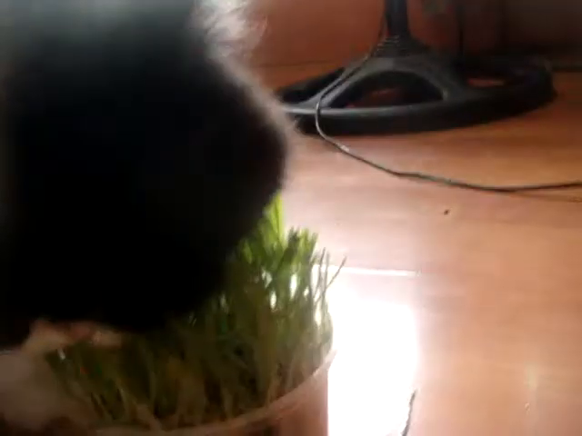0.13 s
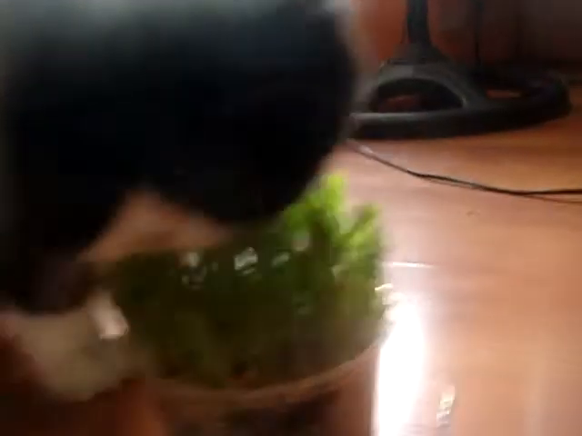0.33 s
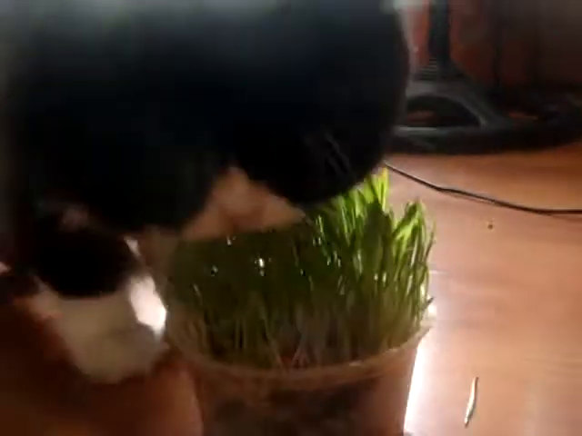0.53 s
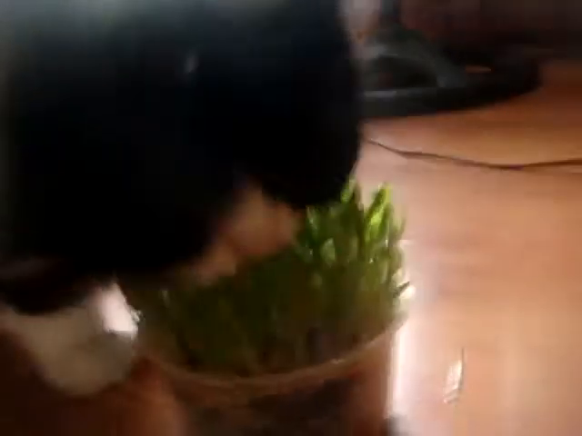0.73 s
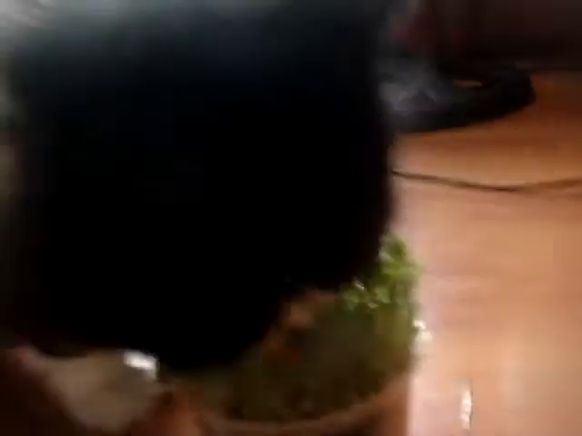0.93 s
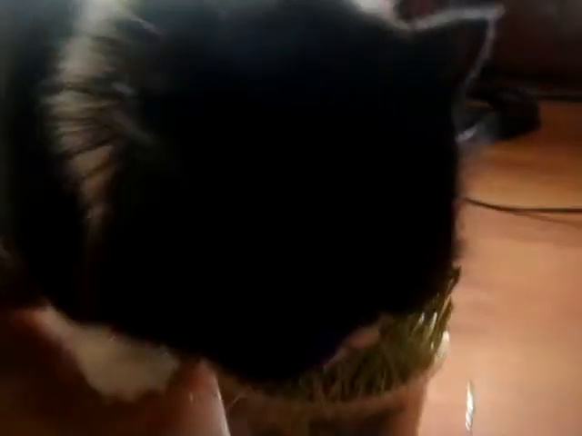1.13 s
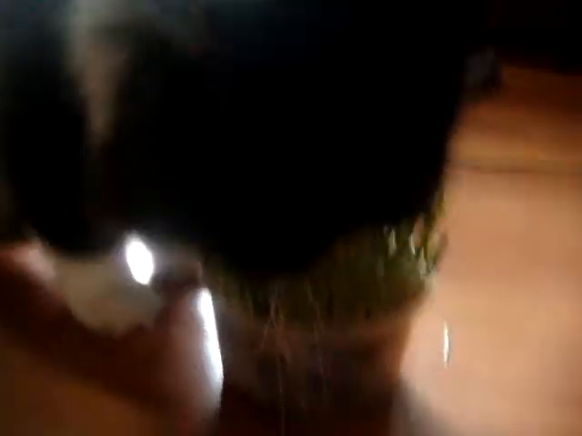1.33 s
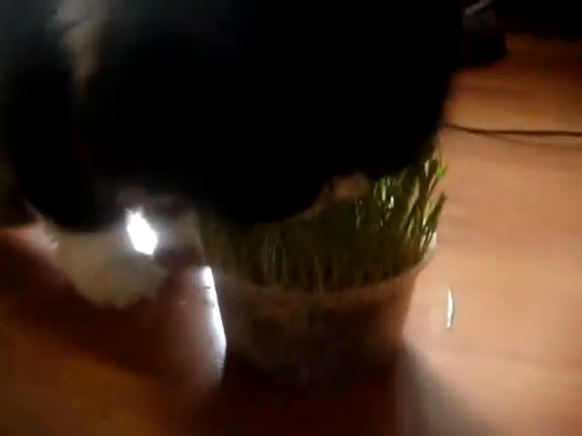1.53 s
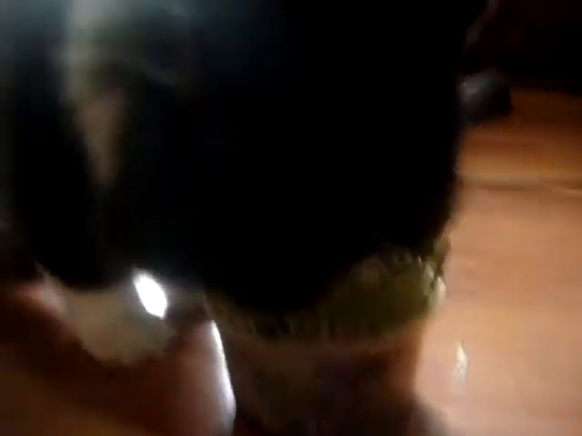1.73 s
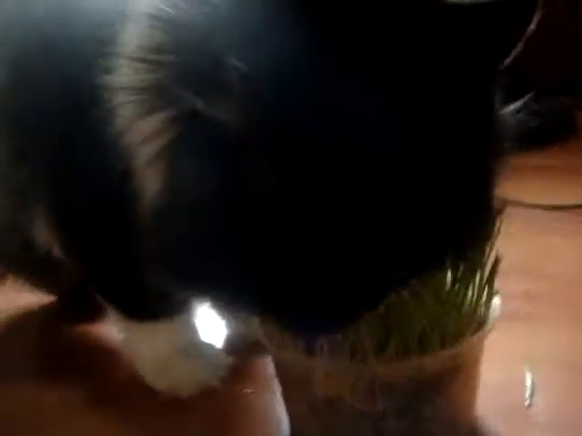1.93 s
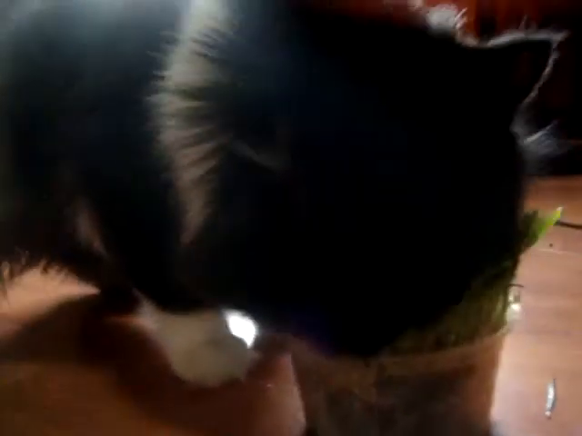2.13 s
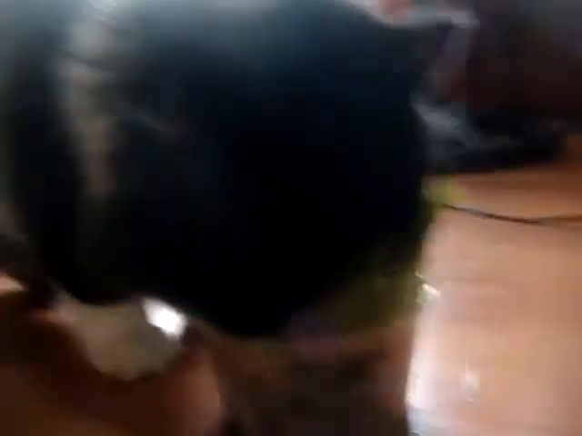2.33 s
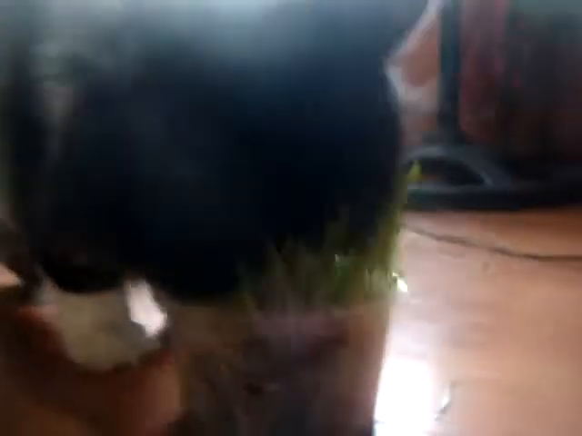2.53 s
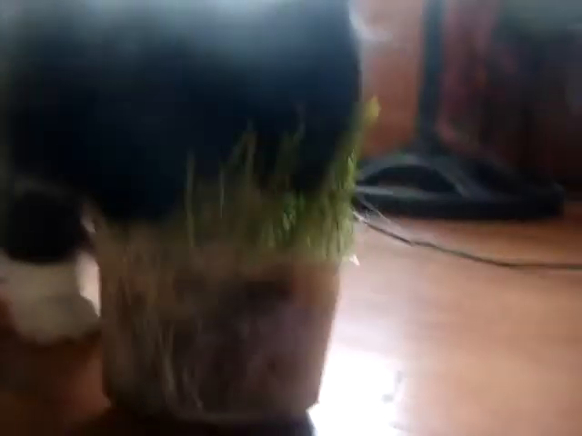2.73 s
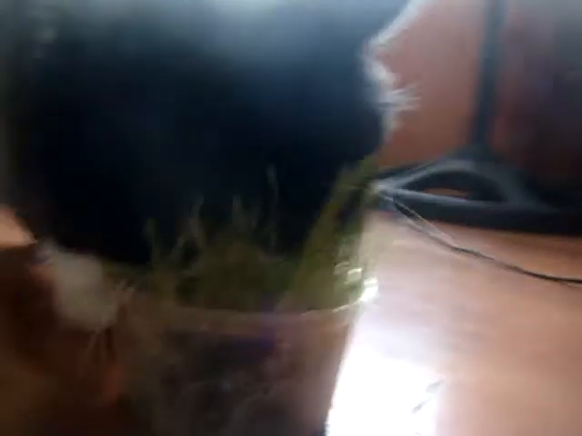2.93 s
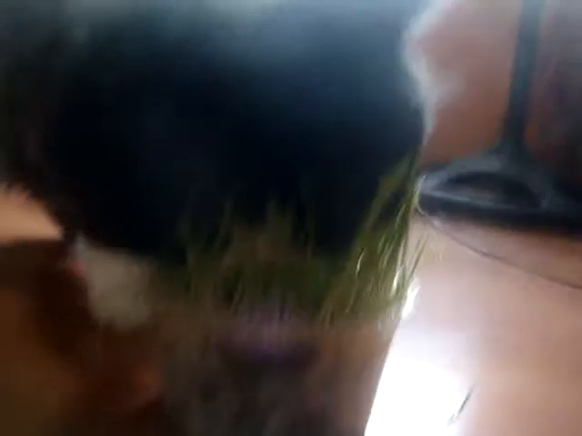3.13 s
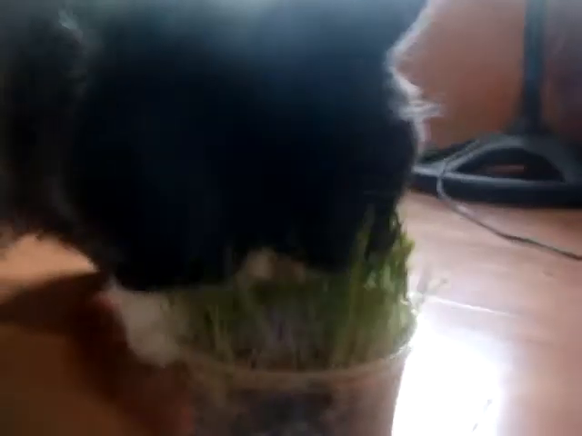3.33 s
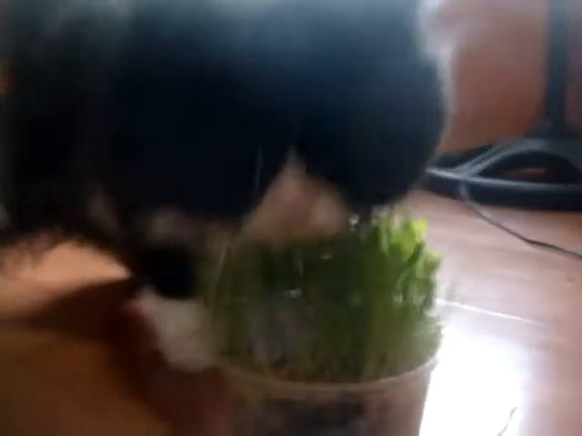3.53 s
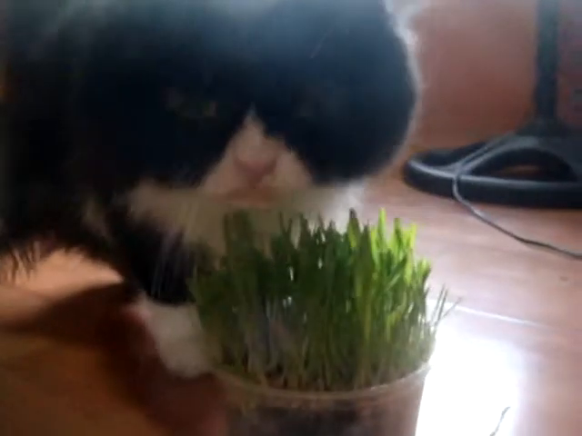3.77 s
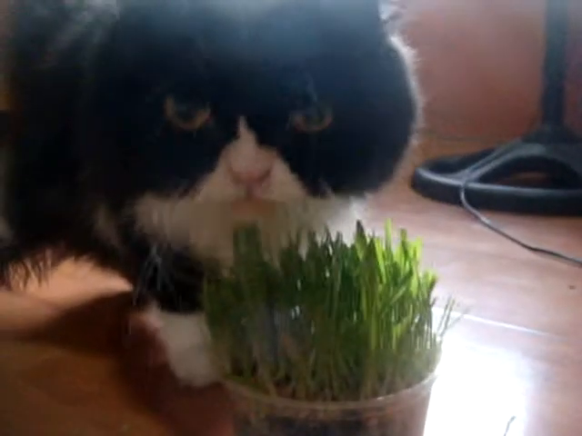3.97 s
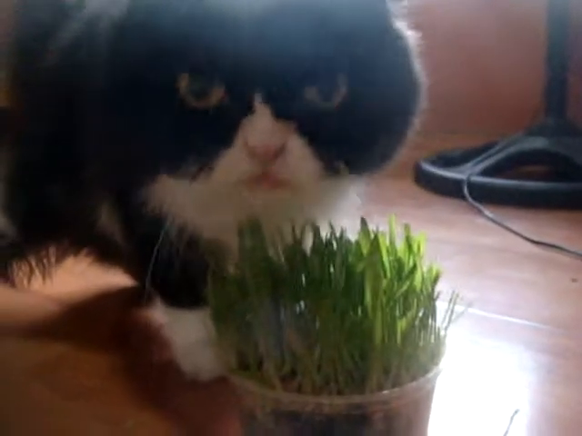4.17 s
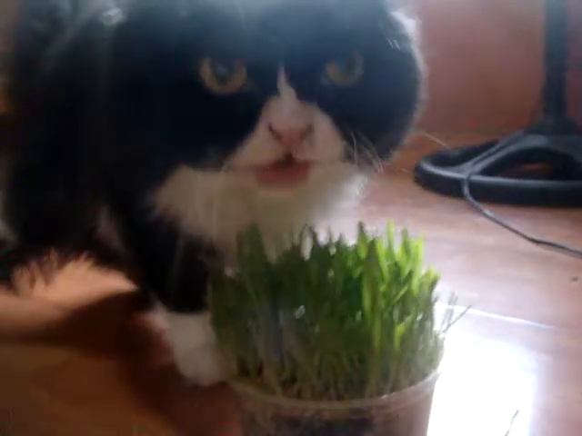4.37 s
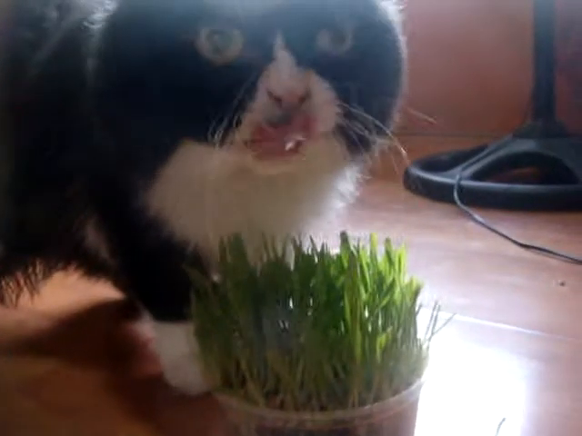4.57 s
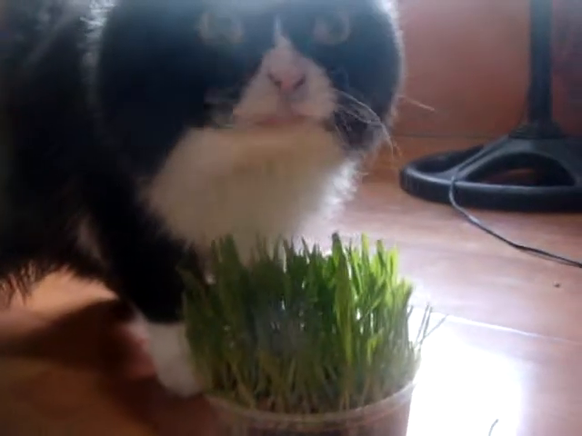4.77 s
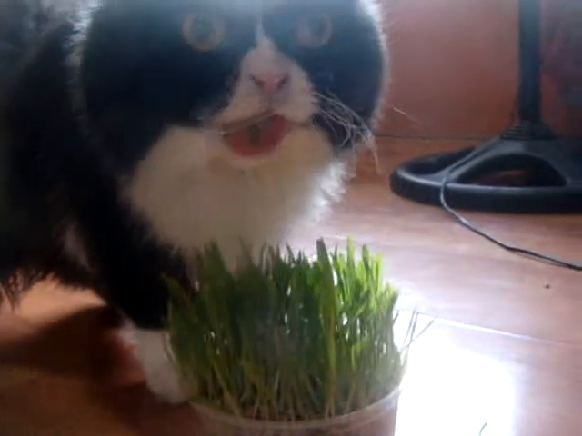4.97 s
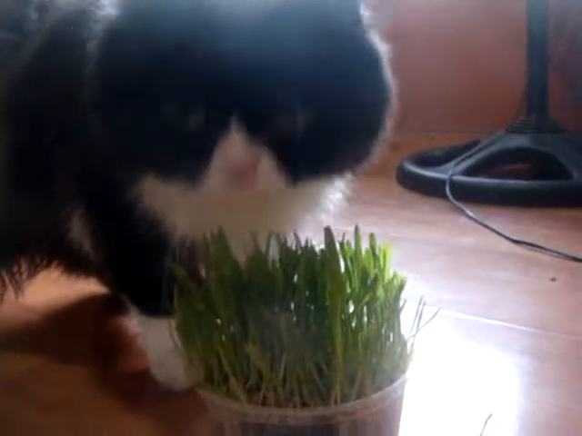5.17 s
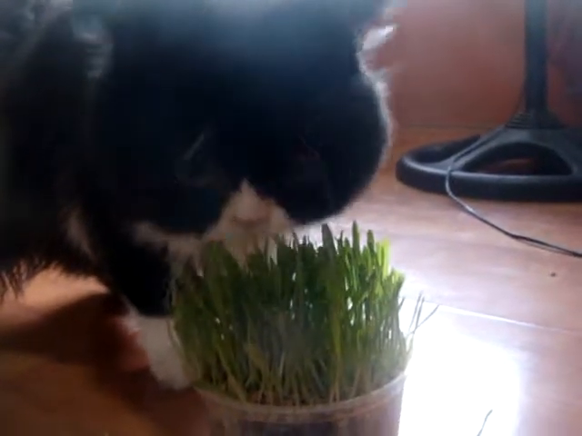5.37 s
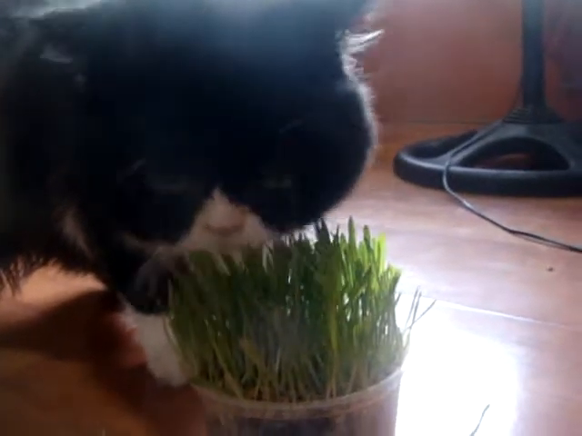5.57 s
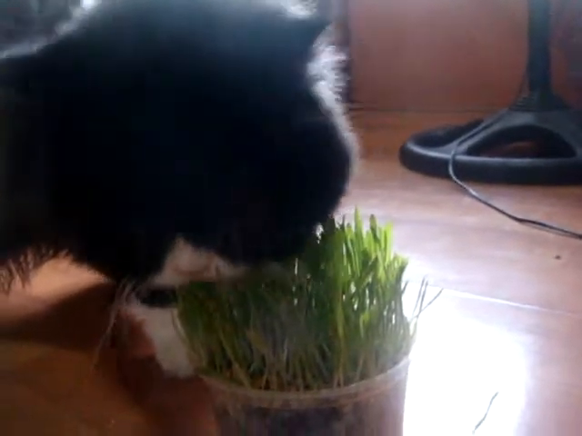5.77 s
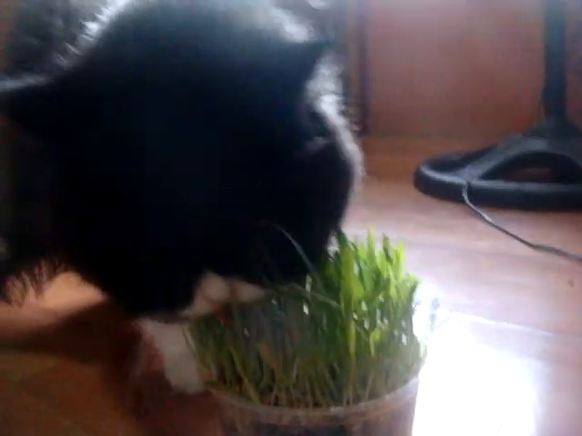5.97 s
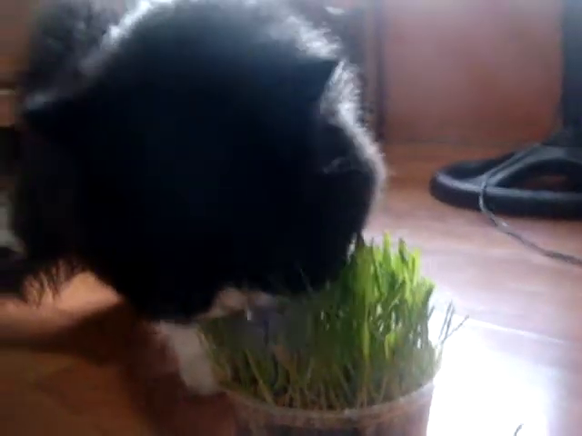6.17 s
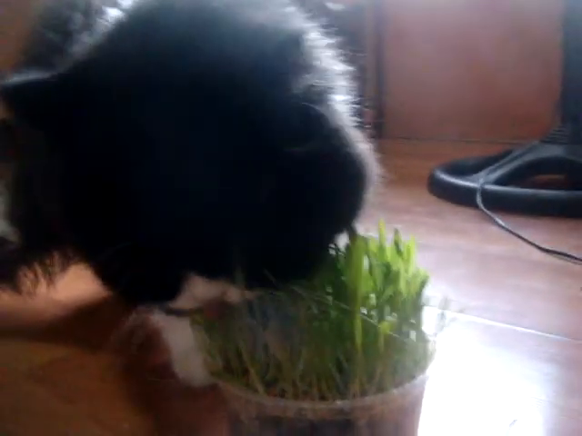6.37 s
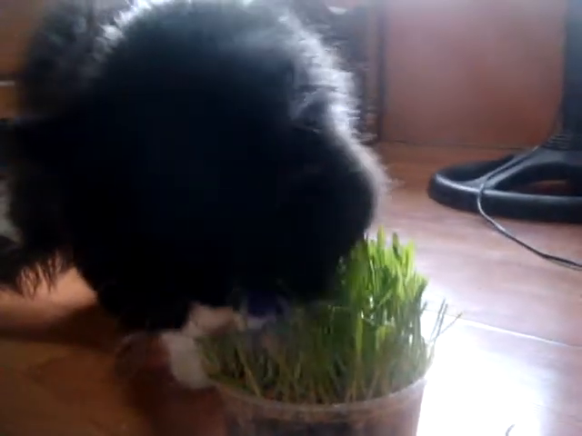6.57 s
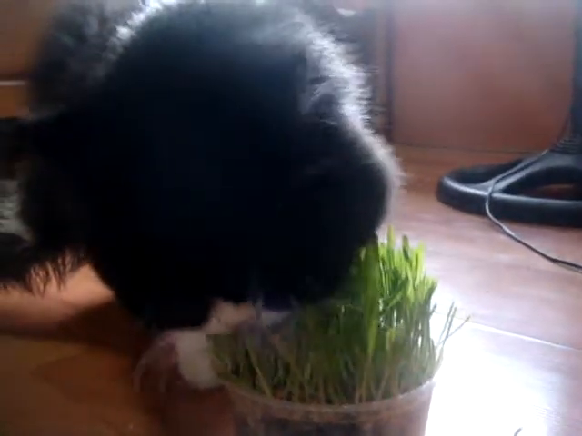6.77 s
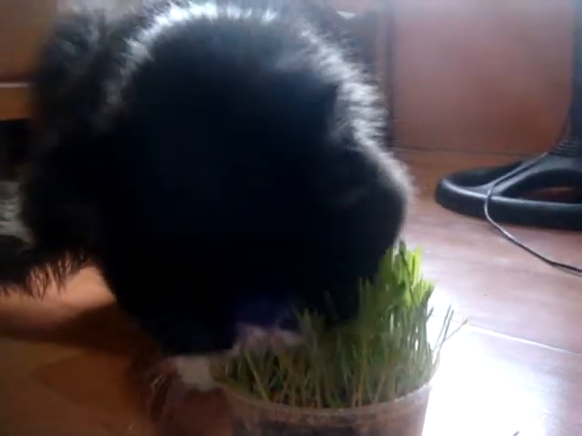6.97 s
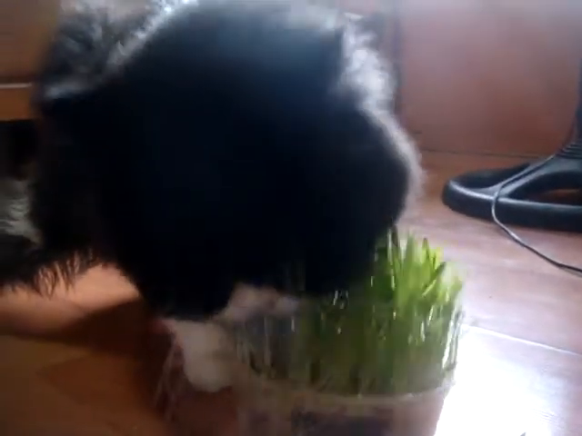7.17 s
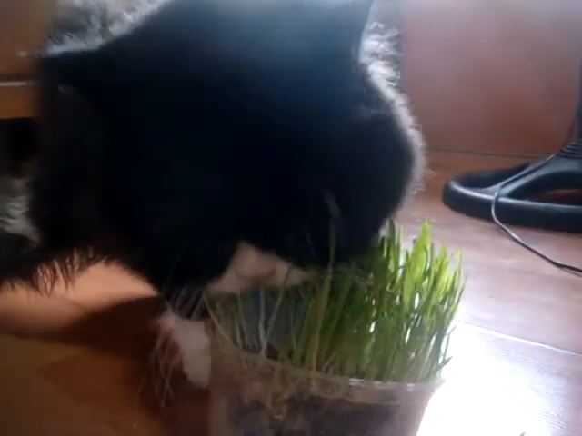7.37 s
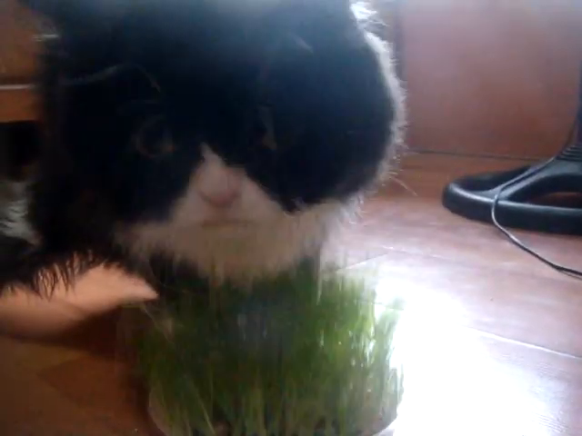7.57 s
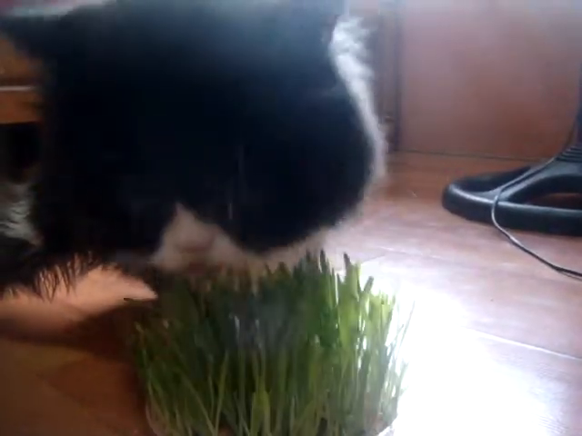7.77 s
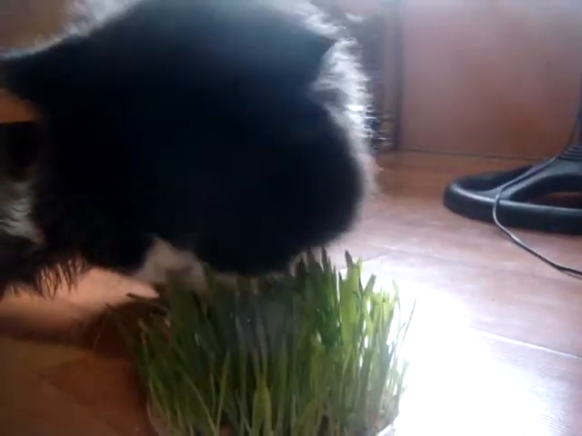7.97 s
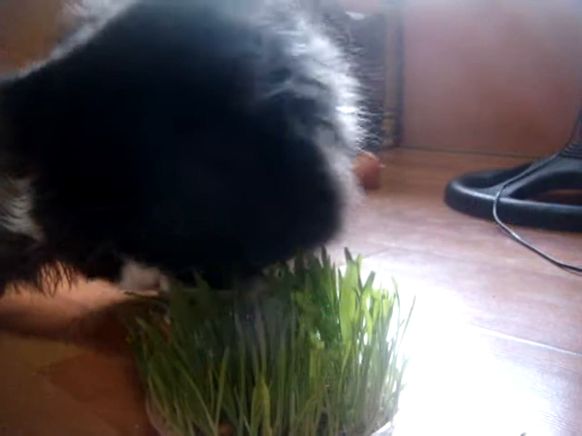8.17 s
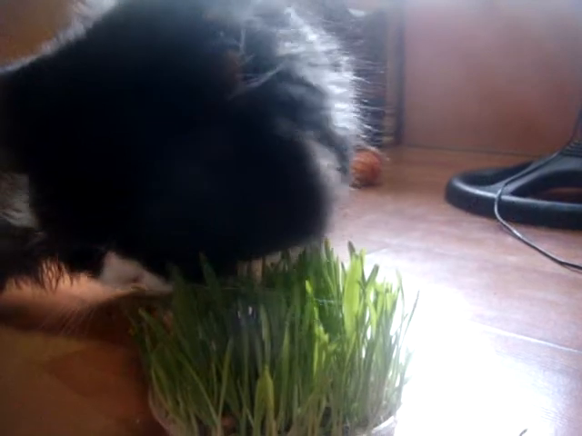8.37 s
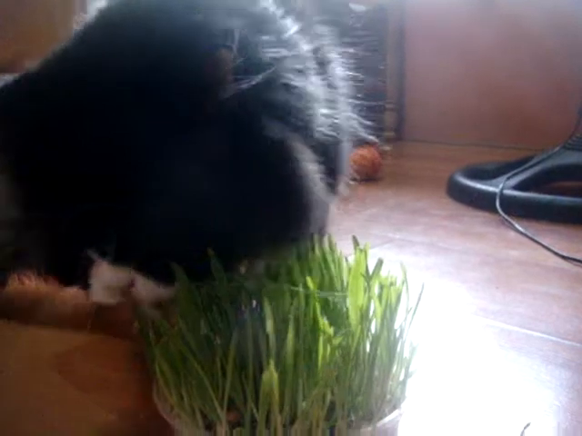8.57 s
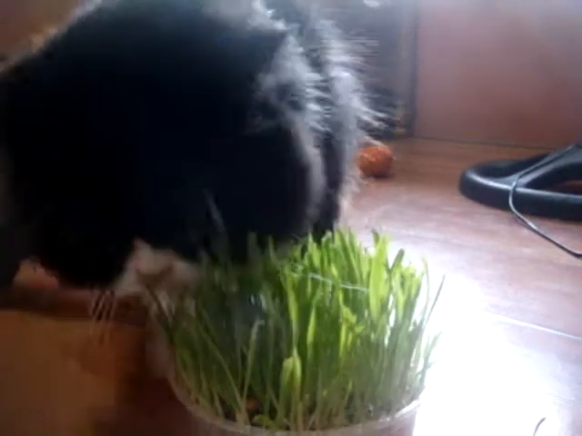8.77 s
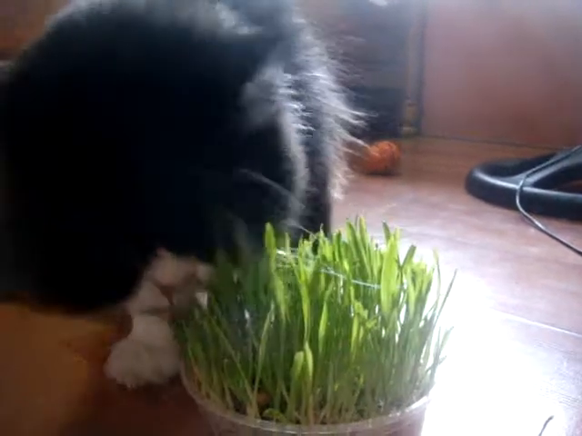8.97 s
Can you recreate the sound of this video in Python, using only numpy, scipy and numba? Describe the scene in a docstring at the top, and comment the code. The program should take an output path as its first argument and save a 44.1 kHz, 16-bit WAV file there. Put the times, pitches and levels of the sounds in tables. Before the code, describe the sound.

A cat eats grass from a thin plastic pot close to the microphone, over faint room hum and hiss. A few crisp snaps open at about 0.3 seconds. From 0.6 to 2.3 seconds a hoarse rooster crows faintly in the distance, smeared by echo. Loud, sharp snaps with low bumps of pot and microphone land at 1.5 to 1.7 seconds. From about 2.2 to 3.3 seconds the cat bites and tears, with rasping fibres, a ringing pot and more thumps; a very faint breathy whistle lingers until 4 seconds. From 3.5 to 7 seconds it is quieter, with soft licks, small snaps and wet, crackling chewing. Dense snapping and tearing returns at 7.2 seconds, peaking in a loud crack and knock near 7.7. The far rooster crows again from 7.6 to 9 seconds, under a few last small bites.

```python
"""A room with a hard floor, where a cat bites and tears grass in a plastic pot close to a small camera mic.
Up front, blades snap crisply, tearing fibres rasp and ring the thin pot, and pot and camera bump.
The tongue licks in gliding puffs of noise and the wet mouth crackles as it chews.
Far off, a rooster crows twice, hoarse and smeared by the yard's echo.
Underneath sits a bed of room hum and hiss, with a faint breathy whistle for a moment."""
import sys
import numpy as np
from scipy import signal
from scipy.io import wavfile
from scipy.ndimage import uniform_filter1d
from numba import njit

SR = 44100
rng = np.random.default_rng(int(sys.argv[2]) if len(sys.argv) > 2 else 0)


def materialize(psi):
    """Save the field psi as 16-bit PCM at rate SR to the path in sys.argv[1].

    A 1-D psi becomes a single channel; in a 2-D psi each row is a channel.
    """
    bounded = np.clip(np.atleast_2d(psi).T, -1, 1)
    quanta = np.round(bounded * 32767).astype(np.int16)
    wavfile.write(sys.argv[1], SR, quanta)


N = 397341


def undb(db):
    """Decibels to gain."""
    return 10 ** (np.asarray(db) / 20)


def level(x, db):
    """Scale to an rms level."""
    return x * undb(db) / np.sqrt(np.mean(x ** 2))


@njit
def swept_band(x, hz, width):
    """State-variable band-pass, gain 1 at a centre that may move."""
    y, band_state, low_state = np.empty(len(x)), 0., 0.
    for i in range(len(x)):
        g, damping = np.tan(np.pi * hz[i] / SR), width / hz[i]
        v = (band_state + g * (x[i] - low_state)) / (1 + g * (g + damping))
        band_state, low_state = 2 * v - band_state, low_state + 2 * g * v
        y[i] = damping * v
    return y


def band(x, hz, width):
    """Band-pass at a steady centre, gain 1 there."""
    g = np.tan(np.pi * hz / SR)
    kg = g * width / hz
    return signal.lfilter([kg, 0, -kg], [1 + kg + g * g, 2 * g * g - 2, 1 - kg + g * g], x)


def steep_band(x, hz, width):
    """The same band-pass twice, for steeper skirts."""
    return band(band(x, hz, width), hz, width)


def drift(rate):
    """Smooth random modulator: values held 1 / rate s and slewed twice, spread near 1."""
    hold = int(SR / rate)
    steps = np.repeat(rng.standard_normal(N // hold + 1), hold)
    return 1.564 * uniform_filter1d(uniform_filter1d(steps, hold), hold)[:N]


def add(out, x, time):
    """Mix a short sound in at a time in seconds."""
    i = int(time * SR)
    out[i:i + len(x)] += x[:N - i]


def strike(t, t60, attack):
    """Percussive envelope: quick attack, exponential decay, peak 1."""
    envelope = (1 - np.exp(-t / attack)) ** 2 * np.exp(-np.log(1000) * t / t60)
    return envelope / envelope.max()


# EQ curve of the room tone: (frequency [Hz], relative band gain [dB])
ROOM_EQ = [(15, -47), (25, -17), (142, 2), (309, 2.5), (408, -2.5), (551, -4.5), (746, -1.5), (1120, -8),
           (1990, -8.5), (2830, -10.5), (3550, -10.5), (8770, -12), (10200, -17), (13300, -51),
           (22000, -120)]


def room_tone(level_db=-52.5, hiss_from_hz=1500):
    """Hum and hiss in third-octave noise bands that swell a little together and flicker separately."""
    out, swell_db = 0, 0.5 * drift(1.185)
    eq_hz, eq_db = np.transpose(ROOM_EQ)
    for hz in 30 * 2 ** np.arange(0, 8.5, 1 / 3):
        flicker_db = (2.25 if hz < hiss_from_hz else .9) * drift(12)
        db = np.interp(np.log(hz), np.log(eq_hz), eq_db) + swell_db + flicker_db
        out = out + undb(db) * steep_band(rng.standard_normal(N), hz, hz / 3)
    return level(out, level_db)


def whistle(start_s=2.4, end_s=4, fade_s=0.071, level_db=-64):
    """A faint breathy tone: a narrow band of noise that fades in, wavers in level and fades out."""
    t = np.arange(N) / SR
    tone = steep_band(rng.standard_normal(N), hz=2906, width=160) * undb(1.9 * drift(12))
    fade = np.clip(np.minimum(t - start_s, end_s - t) / fade_s, 0, 1)
    return level(tone, level_db) * fade


def yard_echo(dry, t60_s=0.5, wet_db=-2.5):
    """The yard's reflections smear a sound with a diffuse tail."""
    t = np.arange(SR // 2) / SR
    tail = rng.standard_normal(len(t)) * strike(t, t60_s, attack=0.0071)
    tail *= undb(wet_db) / np.sqrt(np.sum(tail ** 2))
    return dry + signal.fftconvolve(dry, tail)[:N]


# Formant curve of the rooster's throat: (frequency [Hz], gain [dB])
THROAT_EQ = [(400, -29), (860, -15), (930, -6.5), (975, -10.5), (1150, -18), (1450, -2), (1900, 0),
             (2240, 3), (2340, -13), (2450, -22), (2600, -14), (2900, -25), (3200, -10), (3600, -20.5),
             (4000, -42)]
# Noise bands of its breath: (centre [Hz], width [Hz], gain [dB])
BREATH_BANDS = [(837, 660, -6), (1780, 216, 4.5), (2280, 480, -1), (2720, 420, -8), (3550, 390, -4.5)]
# Automation of the crows, one list a note: (time [s], pitch [Hz], voice gain [dB], breath gain [dB])
CROW_NOTES = [
    [(.57, 1120, -57, -51), (.64, 1120, -62, -48.5), (.7, 1110, -51.5, -56), (.75, 1118, -57, -50),
     (.79, 1070, -62, -57)],
    [(.8, 950, -56, -43), (.86, 988, -45.5, -52), (.95, 963, -49.5, -52.5), (1.06, 935, -53, -46),
     (1.15, 931, -52.5, -44), (1.25, 956, -45, -46), (1.38, 940, -45.5, -47), (1.49, 932, -47, -53),
     (1.6, 898, -57, -51), (1.77, 884, -55, -45), (1.86, 871, -43.5, -54.5), (2.15, 817.4, -50, -52.5),
     (2.28, 791, -74, -58)],
    [(7.6, 975, -47, -33.5), (7.72, 960, -55, -51), (7.77, 880, -49, -59), (7.8, 902, -44.5, -50),
     (7.83, 968, -47.5, -51), (7.92, 976, -47, -48), (7.98, 981, -36, -61), (8.04, 973, -47, -52),
     (8.12, 974, -48, -48.5), (8.17, 970, -62, -53.5), (8.3, 966, -59, -60), (8.4, 960, -55, -58),
     (8.48, 930, -67, -76)],
    [(8.38, 786, -49, -59), (8.46, 830, -54.5, -76), (8.58, 843, -47.5, -73), (8.68, 828, -53.5, -77),
     (8.76, 823, -47.5, -70), (8.88, 795.5, -48.5, -67), (8.95, 773, -55, -73), (9.04, 755, -66, -66.5)],
]


def rooster(fade_s=0.028, trim_db=-3):
    """Trembling harmonics shaped by the throat, subharmonics from alternate cycles, and raspy breath."""
    out = np.zeros(N)
    tremble, flutter = drift(120), drift(50)
    breath = level(sum(undb(db) * steep_band(rng.standard_normal(N), hz, width)
                       for hz, width, db in BREATH_BANDS), 0)
    throat_hz, throat_db = np.transpose(THROAT_EQ)
    for note in CROW_NOTES:
        times, *lanes = np.transpose(note)
        i = np.arange(int(times[0] * SR), min(int(times[-1] * SR), N))
        t = i / SR
        hz, voice_db, breath_db = (np.interp(t, times, lane) for lane in lanes)
        # a hoarser voice has more subharmonics and a shakier pitch
        hoarseness = undb(breath_db - voice_db)
        sub_gain = 0.03 + 0.15 * hoarseness
        jitter = (0.0035 + 0.0056 * np.minimum(hoarseness, 1)) * tremble[i]
        phase = 2 * np.pi * np.cumsum(hz * (1 + jitter)) / SR

        def partial(k):
            return np.sqrt(2) * undb(np.interp(k * hz, throat_hz, throat_db)) * np.sin(k * phase)

        voice = sum(partial(k) + sub_gain * partial(k - .5) for k in range(1, 5))
        voice *= undb(voice_db + 1.5 * flutter[i] + 2.8 * tremble[i])
        fade = np.clip(np.minimum(t - times[0], times[-1] - t) / fade_s, 0, 1)
        out[i] += fade * (voice + undb(breath_db) * breath[i])
    return undb(trim_db) * out


def chewing(start_s=2, end_s=7.5, clicks_per_s=15.5, softest_db=-48.5, low_hz=1200, high_hz=5440):
    """Scattered tiny clicks of the wet mouth, each a short ring at its own pitch."""
    out, t, time = np.zeros(N), np.arange(500) / SR, start_s
    envelope = strike(t, t60=0.0066, attack=0.00026)
    for gap, pitch, size in rng.random((200, 3)):
        time -= np.log(gap) / clicks_per_s
        if time < end_s:
            hz = low_hz * (high_hz / low_hz) ** pitch
            add(out, undb(softest_db - np.log(size)) * envelope * np.sin(2 * np.pi * hz * t), time)
    return out


# Tongue strokes: (time [s], length [s], sweep from [Hz], sweep to [Hz], width [Hz], level [dB])
TONGUE_STROKES = [(0.282, .03, 4080, 3980, 300, -53), (0.422, 0.11, 3860, 2470, 110, -57.5),
                  (3.643, 0.082, 2900, 2900, 500, -59), (3.786, 0.054, 2200, 2000, 700, -54),
                  (4.127, 0.055, 3550, 4200, 700, -60), (5.07, 0.084, 2280, 3180, 900, -56.5),
                  (5.383, 0.15, 3000, 2100, 300, -58), (5.74, 0.13, 2980, 2400, 700, -62.5),
                  (6.103, 0.041, 3040, 2550, 800, -54.5), (6.254, 0.092, 3530, 4100, 1200, -62),
                  (6.421, 0.059, 3020, 2500, 700, -63)]


def licks():
    """Puffs of grainy noise through the gliding resonance of the closing mouth."""
    out = np.zeros(N)
    wet_noise = rng.standard_normal(N) * undb(1.6 * drift(150))
    for time, length, from_hz, to_hz, width, db in TONGUE_STROKES:
        sweep = np.linspace(from_hz, to_hz, int(length * SR))
        puff = wet_noise[int(time * SR):][:len(sweep)]
        for _ in range(2):
            puff = swept_band(puff, sweep, float(width))
        add(out, level(puff * np.sqrt(np.hanning(len(sweep))), db), time)
    return out


# Low thumps of pot and camera: (time [s], level [dB], pitch [Hz], decay by 60 dB [s])
THUMPS = [(1.495, -55, 100, 0.046), (1.512, -21.5, 105, 0.03), (1.602, -24.5, 30, 0.041),
          (1.649, -23.5, 27, 0.077), (1.76, -44.5, 209.3, 0.071), (2.969, -31.5, 210, 0.018),
          (3.147, -38, 40, 0.2), (3.147, -31, 129, 0.12), (3.157, -30.5, 107, 0.11),
          (3.19, -43.5, 127, 0.3), (3.24, -52, 239, .2), (7.658, -20.5, 35, 0.043),
          (7.662, -29, 319, 0.072), (7.689, -30, 22, 0.11)]


def bumps():
    """Each knock sets off a slow, heavily damped swing of the microphone body."""
    out, t = np.zeros(N), np.arange(12000) / SR
    for time, db, hz, t60 in THUMPS:
        add(out, undb(db) * strike(t, t60, attack=0.00053) * np.cos(2 * np.pi * hz * t), time)
    return out


# Resonances of the plastic pot: (centre [Hz], half-width [Hz], relative level [dB])
POT_MODES = [(470, 57, 6.5), (1187, 20, 8), (1806, 180, 14), (2340, 9.2, 3.5)]
# Pulls on the grass: (time at full level [s], attack [s], hold [s], release [s], pot level [dB],
# rasp over pot [dB], hiss over pot [dB])
GRASS_PULLS = [(0.266, 0.0084, 0.013, 0.0072, -48, 8, 5), (0.296, .02, 0.11, 0.44, -67, 10, 6.5),
               (2.167, 0.048, 0.023, 0.086, -51, -4, -24), (2.627, 0.011, 0.061, .05, -53, 6, -16),
               (2.746, 0.12, 0.063, 0.049, -35, -0.5, -9.5), (2.876, .04, 0.039, .05, -49.5, -2, -6.5),
               (2.959, 0.072, 0.023, 0.056, -40, 0, -14), (3.006, .03, 0.09, 0.44, -60.5, 3.5, 6.5),
               (3.27, 0.035, 0.015, 0.33, -50.5, -4.5, -20), (4.0, 0.25, 0.044, 0.22, -60, -19, -22),
               (4.703, 0.0038, 0.0076, .06, -49.5, -5, -1), (5.305, 0.036, 0.033, 0.044, -63, 6.5, -2),
               (5.415, 0.012, .02, 0.06, -61.5, 8, -1), (7.296, 0.08, 0.053, 0.035, -44, 6, -6),
               (7.337, 0.062, 0.056, 0.28, -40.5, -7, -30), (7.453, 0.0082, 0.018, 0.025, -45, 6, -9),
               (7.51, 0.022, 0.041, 0.032, -43.5, 2, -16), (7.592, .01, 0.028, 0.013, -50, 5.5, -1),
               (7.655, 0.0045, 0.0066, 0.068, -26.5, -1, -13), (7.685, 0.014, 0.03, 0.043, -42, 0, 5),
               (8.548, 0.077, 0.039, 0.088, -67, 11, 2)]


def tearing(cracks_per_s=1000, ramp_db=20):
    """Dense clumps of uneven fibre cracks ring the thin pot, rasp along the blades and hiss."""
    onsets = rng.random(N) < cracks_per_s / SR
    sizes = undb(np.minimum(3 * rng.exponential(size=N), 7))
    grains = level(np.convolve(onsets * sizes, np.hanning(96))[:N], 0)  # about 2 ms a crack
    texture = (grains + 0.62) * undb(1.3 * drift(60))  # cracks over a steady rub
    cracks = texture * rng.standard_normal((4, N))
    modes = sum(undb(db) * band(cracks[0], hz, 2 * half_width) * np.sqrt(1000 / half_width)
                for hz, half_width, db in POT_MODES)
    body = band(cracks[1], 1090, 1500)
    pot = level(level(modes, -3) + level(body, -2.8), 0)
    rasp = level(band(band(cracks[2], 3550, 2400), 4030, 2300), 0)
    hiss = level(steep_band(cracks[3], 8200, 8700), 0) * undb(3.6 * drift(44))
    power, t = np.zeros((3, N)), np.arange(N) / SR
    for time, attack, hold, release, db, rasp_db, hiss_db in GRASS_PULLS:
        span = slice(max(int((time - 2 * attack) * SR), 0), int((time + hold + 2 * release) * SR))
        # a pull gains ramp_db over each attack time and loses it over each release time
        ramp = np.maximum((time - t[span]) / attack, (t[span] - time - hold) / release)
        pull_db = db - ramp_db * np.maximum(ramp, 0)
        power[:, span] += undb(pull_db + np.array([[0], [rasp_db], [hiss_db]])) ** 2
    return np.sum(np.sqrt(power) * [pot, rasp, hiss], axis=0)


# Snaps of blades, teeth and lips: (time [s], base level [dB], ring [Hz], treble offset [dB])
BITE_SNAPS = [(.239, -28, 4150, -9), (.255, -27, 3700, -12), (.337, -38, 4900, 6), (0.352, -39, 4960, -14),
              (.365, -40, 5000, -14), (0.374, -35.5, 4900, 1.5), (0.777, -28, 4540, 2.5),
              (0.783, -42, 4800, 10), (0.889, -43.5, 475, -4), (1.005, -39.5, 452, 2), (1.064, -41, 500, 3),
              (1.168, -44, 400, -20), (1.378, -33, 450, -17), (1.5172, -4.5, 1170, -5),
              (1.5193, -8.5, 4240, -7), (1.584, -25.5, 6000, -6), (1.603, -31, 6190, -9),
              (1.6028, -15.5, 5000, 4), (1.607, -15, 810, 2), (1.641, -22, 6450, 0),
              (1.6469, -13, 8900, -10), (1.6485, -16.5, 694, 4.5), (1.7585, -36, 971, -1),
              (2.16, -34, 3500, 1), (2.238, -30, 8200, -16), (2.2896, -31.5, 1580, -16),
              (2.334, -30, 1275, -7), (2.361, -31.5, 1960, 2.5), (2.467, -38, 496, -9),
              (2.631, -35, 3960, -21), (2.685, -31.5, 450, -20), (2.7043, -26, 3730, -12),
              (2.729, -22.5, 1970, -6), (2.7517, -22, 1930, -12), (2.756, -20, 2090, -3),
              (2.779, -21.5, 1940, -2), (2.7885, -19, 2800, -5), (2.823, -33, 2000, -5),
              (2.936, -30.5, 1970, 1.5), (2.9571, -20, 3680, -2.5), (2.9666, -27.5, 3880, 0),
              (2.974, -26.5, 623, 0), (3.161, -28.5, 1190, -18), (3.238, -28, 490, -40),
              (3.247, -30, 530, -25), (3.259, -27.5, 447, -25), (3.268, -28, 1050, -15),
              (3.349, -38, 8350, 0), (3.412, -35, 950, -6), (3.471, -37, 8100, -3), (3.4888, -36, 3900, 1),
              (3.524, -34.5, 3040, -4), (3.687, -37, 2740, -11), (3.7456, -37, 1680, -8),
              (3.766, -40, 1000, -12), (3.78, -39, 2500, -5), (3.783, -22.5, 1980, -17),
              (3.787, -20, 1970, -15), (3.8057, -18.5, 2130, -25), (3.87, -45, 4500, 2),
              (3.91, -25.5, 2170, -22), (3.93, -40, 1090, -13), (3.9456, -37.5, 1010, -3),
              (3.954, -38, 1220, -6), (4.003, -38, 513, -15), (4.016, -38.5, 2000, 6),
              (4.021, -34.5, 5960, -6), (4.037, -43, 1200, -20), (4.05, -37, 676, -20),
              (4.0735, -41, 2020, -5), (4.1225, -38.5, 2200, 0), (4.134, -35.5, 3800, -10),
              (4.323, -41, 3400, -7), (4.412, -36.5, 5250, 0), (4.418, -34, 7960, -7),
              (4.701, -31, 9100, -14), (4.706, -39, 1930, -3), (4.737, -38, 3480, 0),
              (4.918, -33.5, 463, -28), (4.958, -42.5, 1300, -9), (5.001, -43, 1310, -18),
              (5.06, -20.5, 2190, -40), (5.3963, -38, 2430, 6), (5.402, -31, 4300, -3),
              (5.579, -46, 2500, -15), (5.7608, -38, 2740, 2), (5.772, -41, 2870, 1),
              (5.93, -49, 2900, -17), (5.964, -42, 368, -17), (6.007, -47, 2720, -3),
              (6.111, -35, 5400, -2), (6.119, -35.5, 5930, -2.5), (6.285, -49, 3300, -15),
              (6.523, -32.5, 3550, 0), (6.528, -36, 3380, 0.5), (6.669, -43, 2700, -17),
              (6.7125, -37.5, 6800, -5), (7.2055, -18.5, 3530, -1.5), (7.285, -27, 4030, -3),
              (7.3202, -26.5, 2140, 3), (7.338, -26, 3800, -4), (7.3571, -16.5, 2780, 1),
              (7.3653, -23, 3470, -3), (7.3808, -19.5, 2820, -1), (7.396, -26, 4970, 6.5),
              (7.401, -26, 6130, 5.5), (7.405, -25.5, 3200, 2), (7.414, -33, 3970, -10),
              (7.4304, -26, 3570, 5), (7.5118, -21.5, 3460, 4), (7.548, -33.5, 1980, 2),
              (7.596, -28, 3360, -1), (7.629, -36, 1890, 5), (7.6589, -4, 3740, 5.5),
              (7.661, -17.5, 810, -10), (7.6675, -19, 3770, -19), (7.8973, -29.5, 2370, -7),
              (8.17, -39, 2370, -6), (8.29, -37.5, 1510, -8), (8.324, -40.5, 1220, 3.5),
              (8.335, -37.5, 3200, -8), (8.3888, -24, 9400, 0), (8.564, -47, 3400, -15)]


def snaps(lead_s=.006, spike_db=2, spike_s=0.0002, tail_db=-20, tail_s=0.003):
    """Each snap is a brief burst of noise, rising and fading in a few ms around one sharp click."""
    out, t = np.zeros(N), np.arange(3000) / SR - lead_s  # t is 0 at the click
    impulse = np.zeros(len(t))
    impulse[int(lead_s * SR)] = 1
    spike = undb(spike_db) * np.exp(-np.abs(t) / spike_s)
    mouth_tail = undb(tail_db) * (t > 0) * np.exp(-t / tail_s)
    for time, db, hz, treble_db in BITE_SNAPS:
        noise = rng.standard_normal((4, len(t)))
        length = max(0.0126 - 0.000196 * (db + 36.5), .002)  # louder snaps are tighter
        burst = spike + np.exp(-np.abs(t) / (np.where(t < 0, .2, .17) * length))
        wet_burst = burst + mouth_tail
        ring = steep_band(wet_burst * noise[0], hz, 250 + 0.19 * hz)
        treble = band(band(burst * noise[1], 9500, 9800), 6000, 6200)
        body = band(burst * noise[2], 500, 1300)
        crack = band(band(wet_burst * noise[3], 2500, 5700), 2700, 4300)
        click = steep_band(impulse, hz, 2.23 * hz) * np.sign(noise[0, 0])
        body_db = -8 - 5 * np.log2(hz / 1000)  # lower rings thud more
        crack_db = -2.5 + 0.43 * treble_db
        # the click takes a smaller share of loud snaps and of dull ones
        click_db = -2.5 - 0.1247 * (min(db, -14) + 27) + 0.2 * min(treble_db, 0)
        layers = (ring, -2), (treble, treble_db), (body, body_db), (crack, crack_db), (click, click_db)
        snap = sum(undb(db + offset_db) * x / np.abs(x).max() for x, offset_db in layers)
        add(out, snap, time - lead_s)
    return out


def scene():
    """Mono mix of the close cat, the distant rooster and the room bed."""
    grass_and_pot = snaps() + bumps() + tearing()
    mix = grass_and_pot + licks() + yard_echo(rooster()) + room_tone() + whistle() + chewing()
    return mix[None]


def record(dry, ceiling=.7, cutoff_hz=10150):
    """The camera soft-clips the loudest peaks and cuts the top end steeply."""
    rounded = ceiling * np.tanh(dry / ceiling)
    low_pass = signal.ellip(10, .2, 60, cutoff_hz, fs=SR, output="sos")
    return signal.sosfilt(low_pass, rounded)


dry = scene()
out = record(dry)
materialize(out)
```